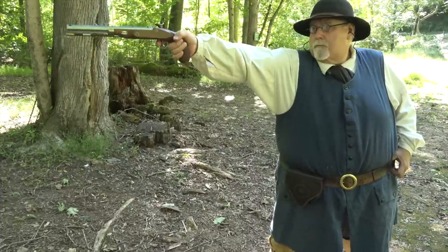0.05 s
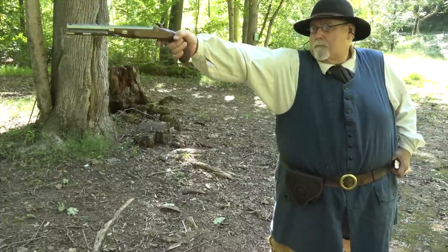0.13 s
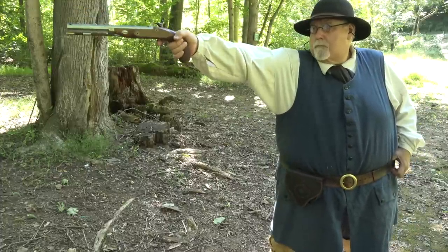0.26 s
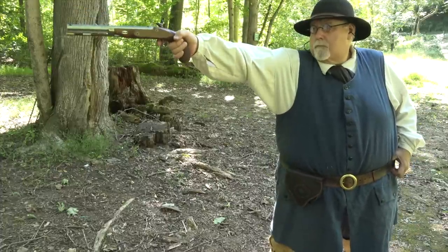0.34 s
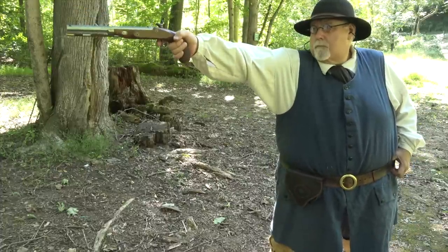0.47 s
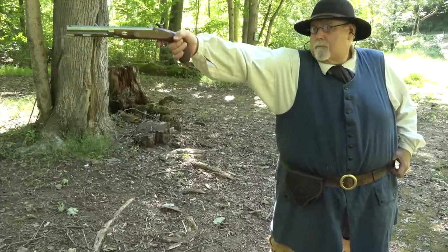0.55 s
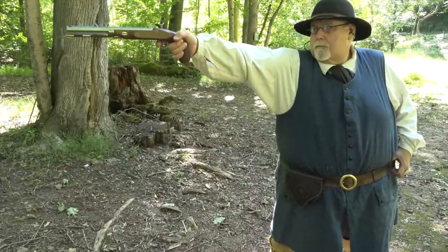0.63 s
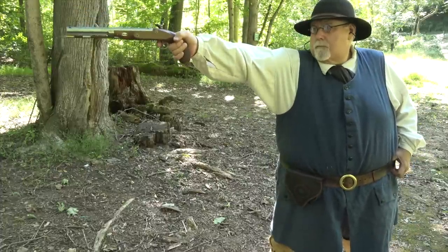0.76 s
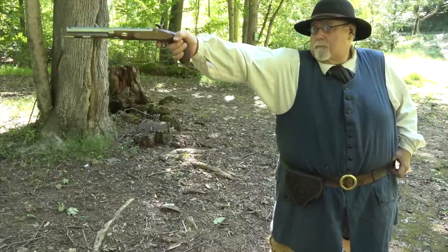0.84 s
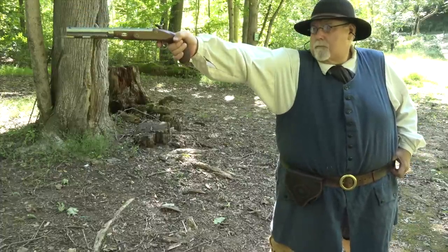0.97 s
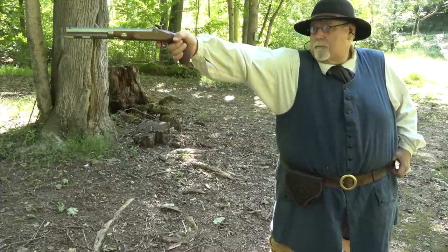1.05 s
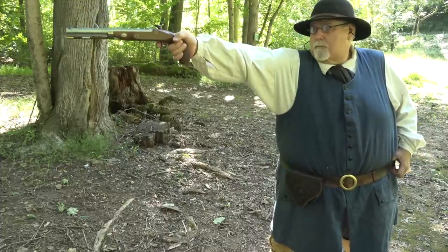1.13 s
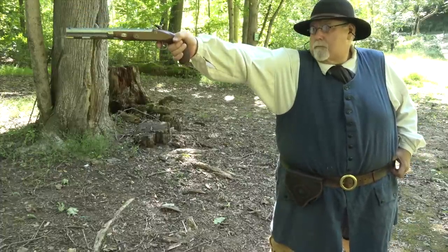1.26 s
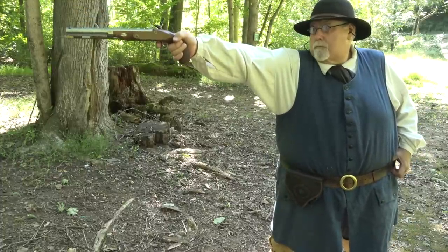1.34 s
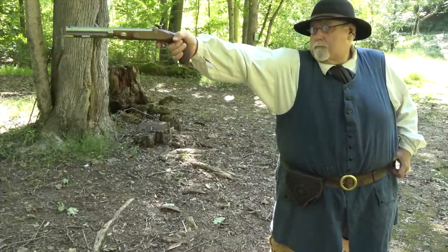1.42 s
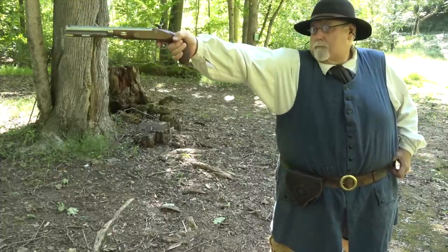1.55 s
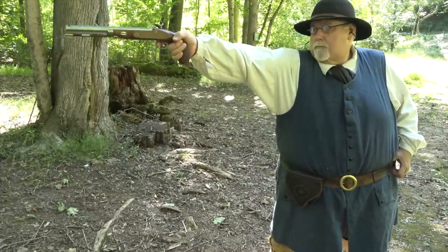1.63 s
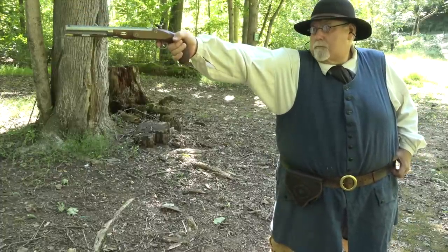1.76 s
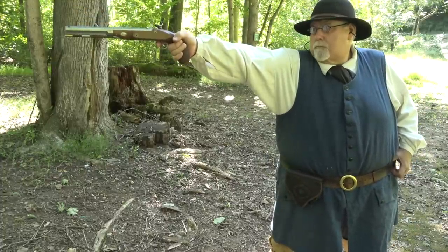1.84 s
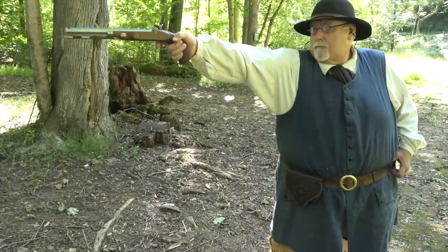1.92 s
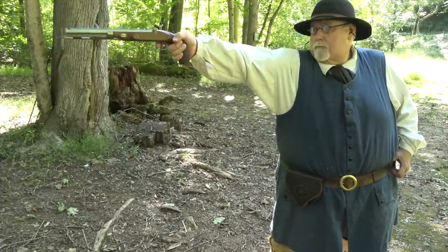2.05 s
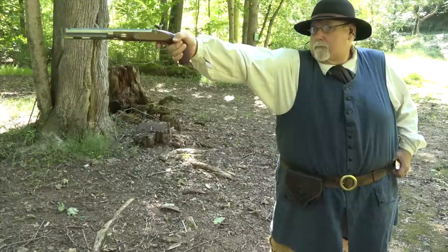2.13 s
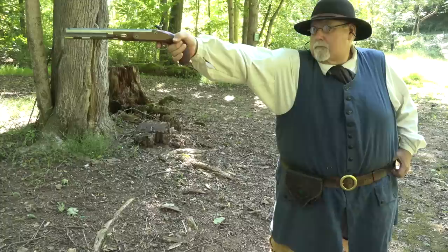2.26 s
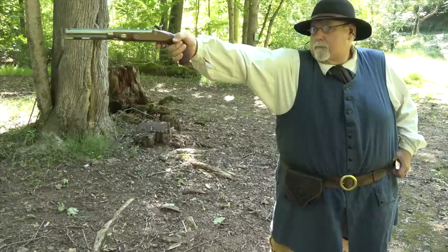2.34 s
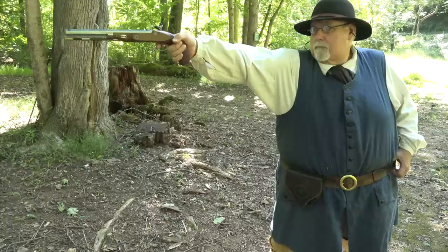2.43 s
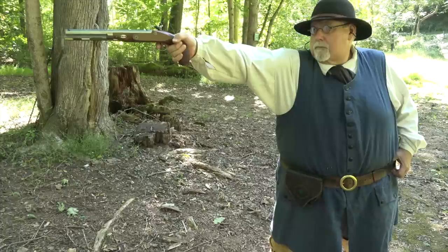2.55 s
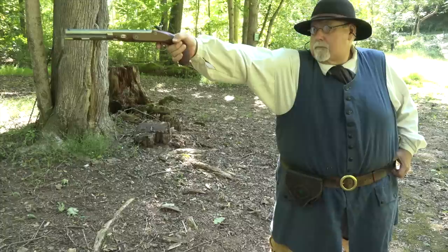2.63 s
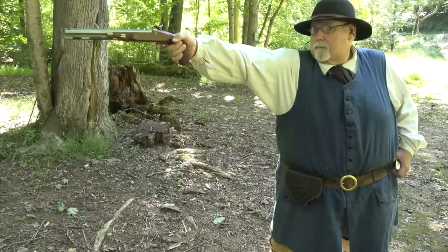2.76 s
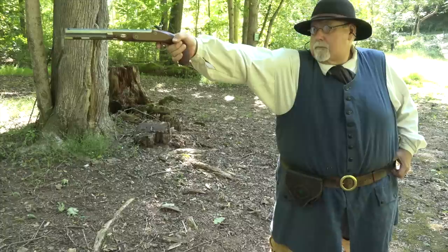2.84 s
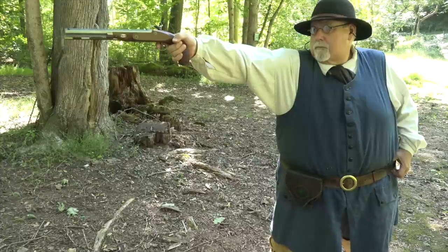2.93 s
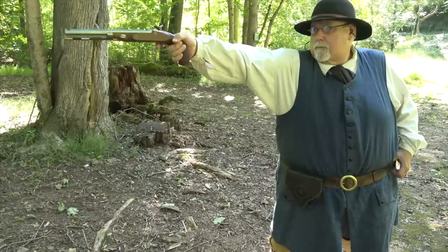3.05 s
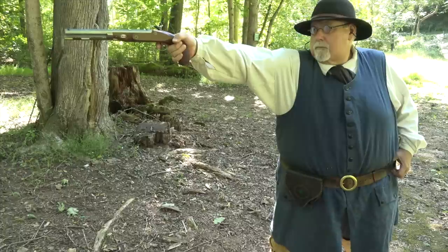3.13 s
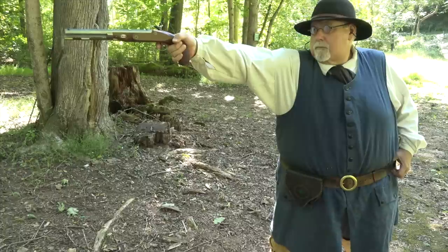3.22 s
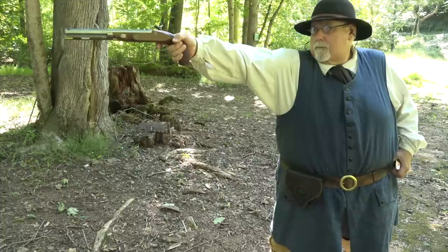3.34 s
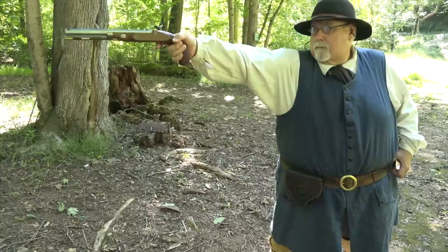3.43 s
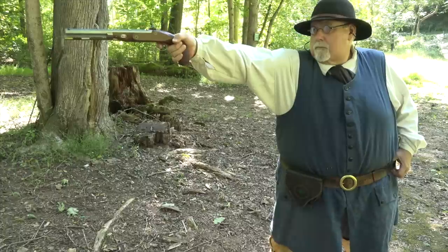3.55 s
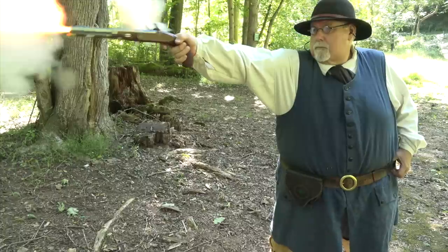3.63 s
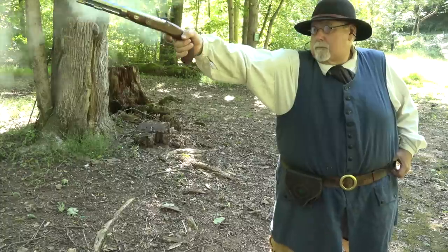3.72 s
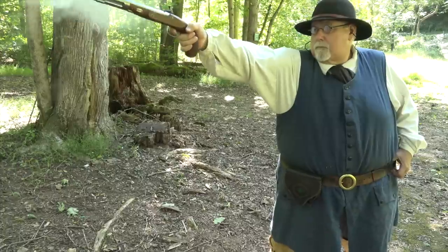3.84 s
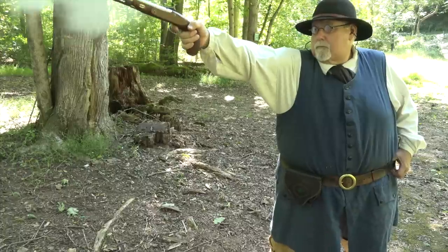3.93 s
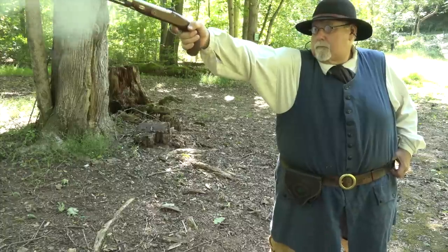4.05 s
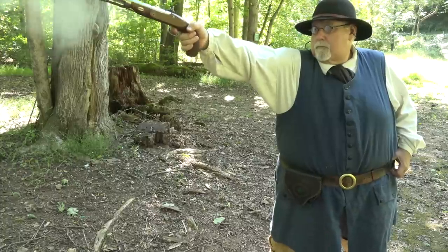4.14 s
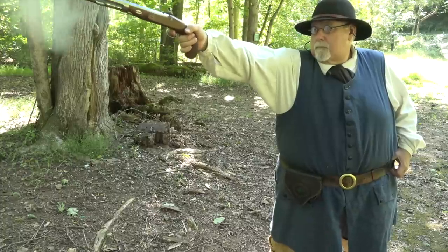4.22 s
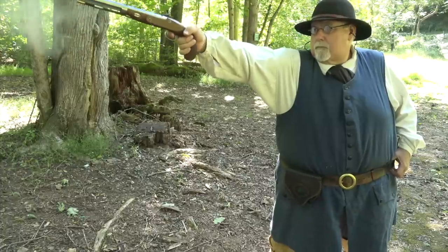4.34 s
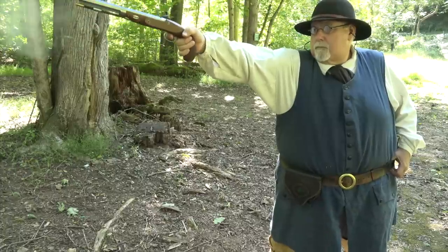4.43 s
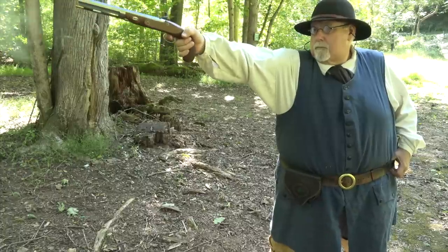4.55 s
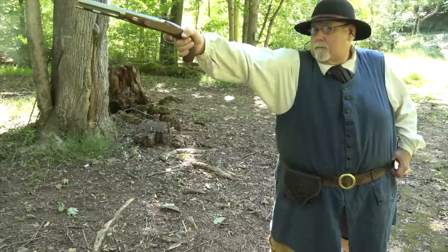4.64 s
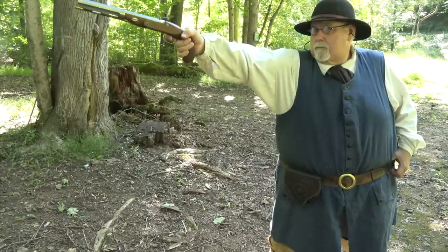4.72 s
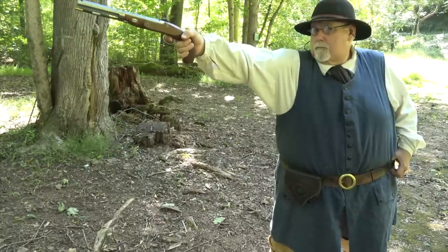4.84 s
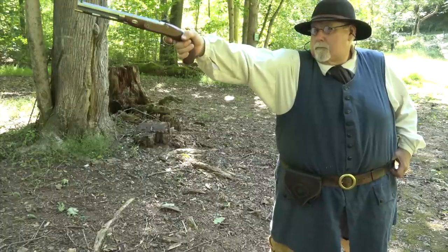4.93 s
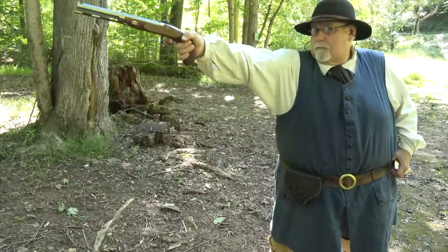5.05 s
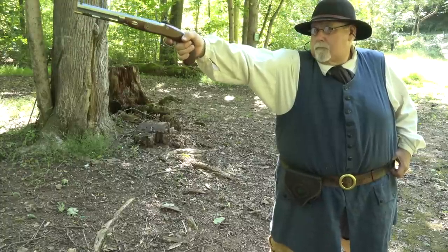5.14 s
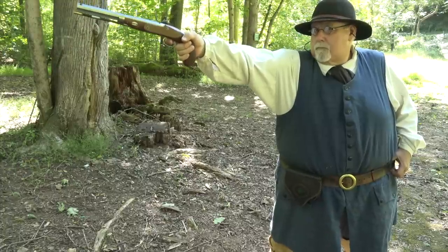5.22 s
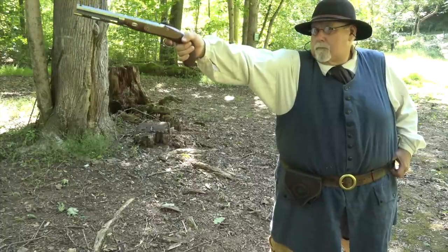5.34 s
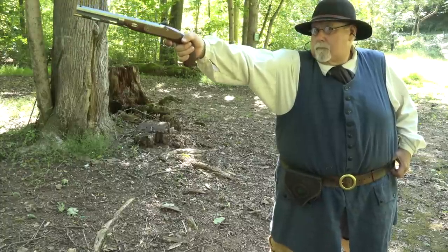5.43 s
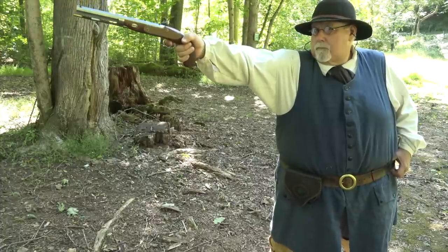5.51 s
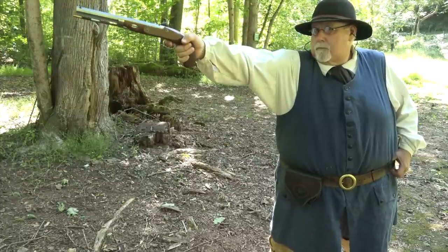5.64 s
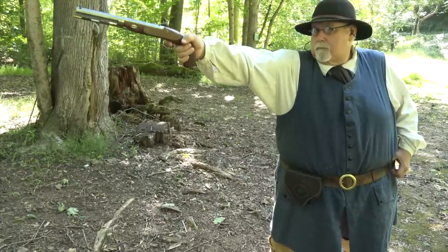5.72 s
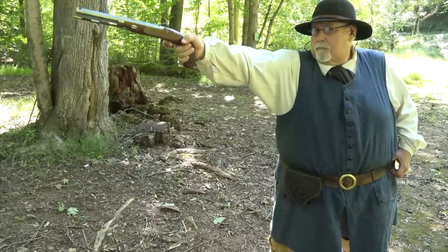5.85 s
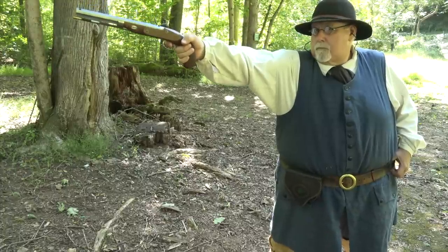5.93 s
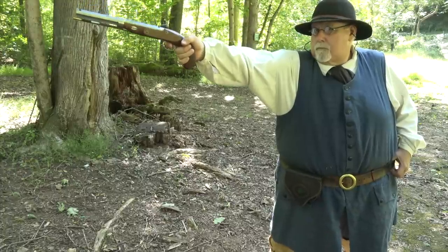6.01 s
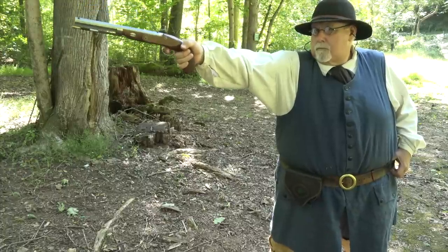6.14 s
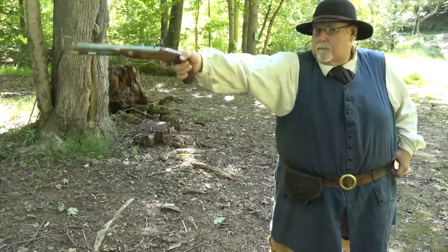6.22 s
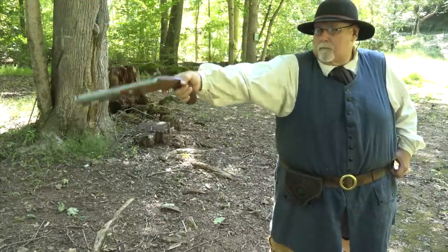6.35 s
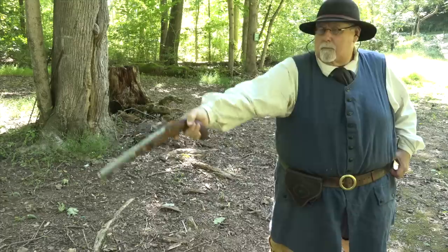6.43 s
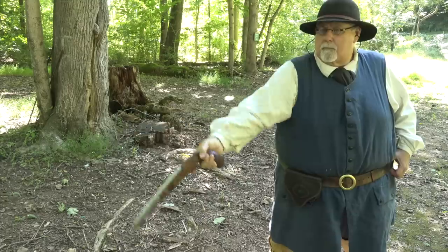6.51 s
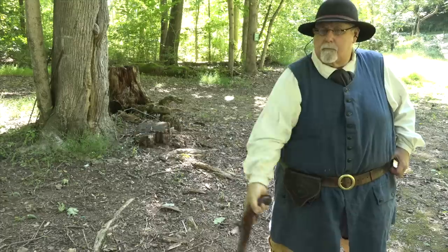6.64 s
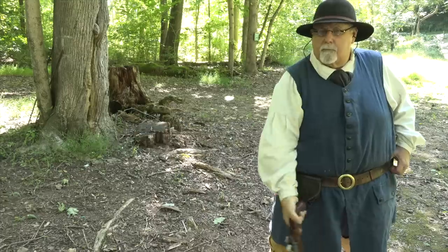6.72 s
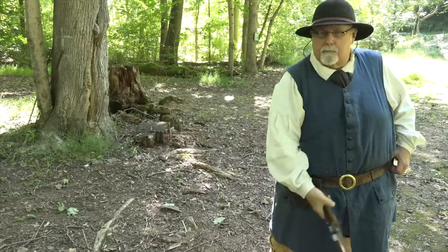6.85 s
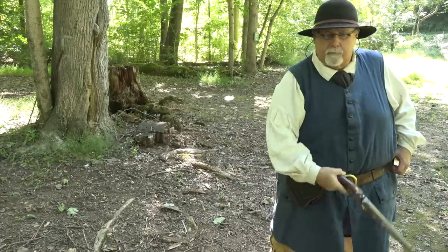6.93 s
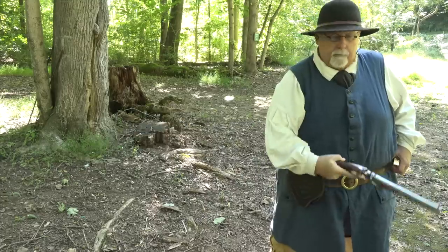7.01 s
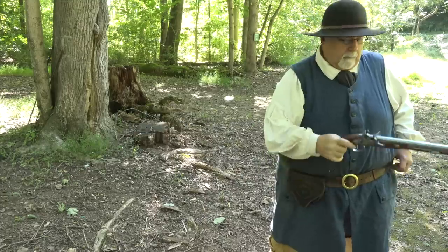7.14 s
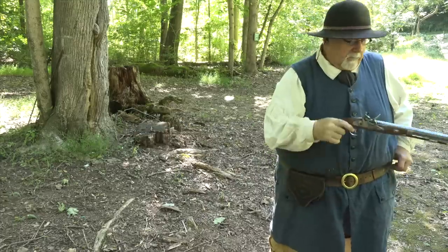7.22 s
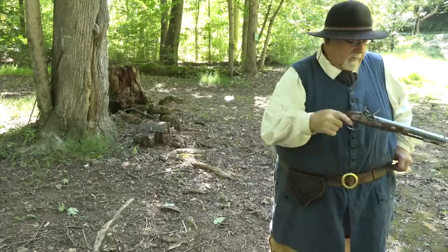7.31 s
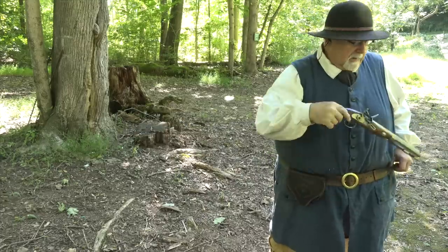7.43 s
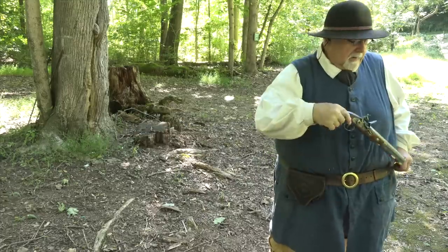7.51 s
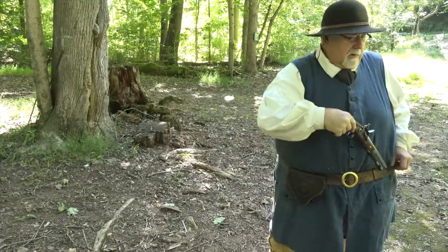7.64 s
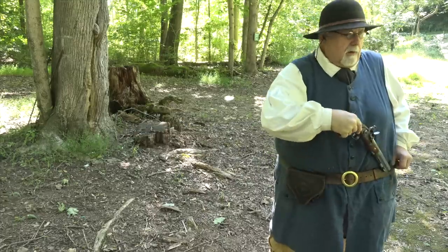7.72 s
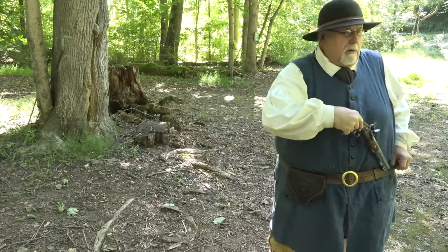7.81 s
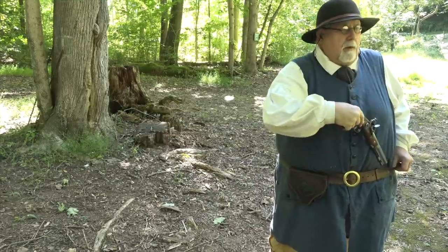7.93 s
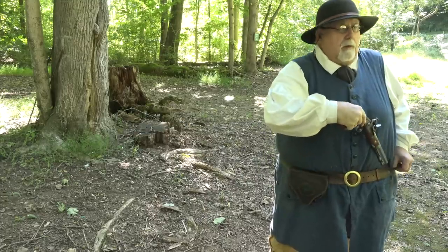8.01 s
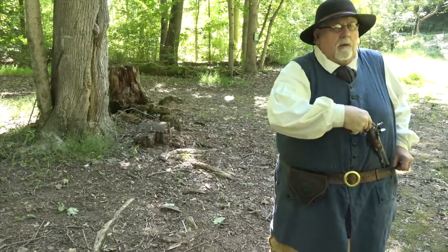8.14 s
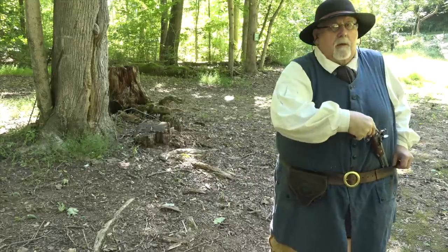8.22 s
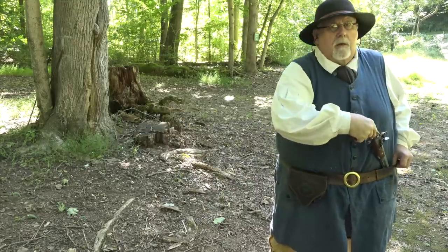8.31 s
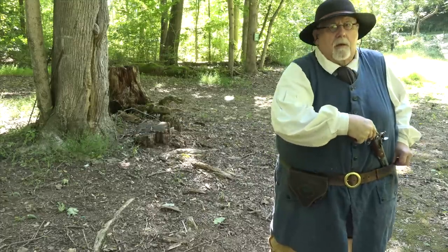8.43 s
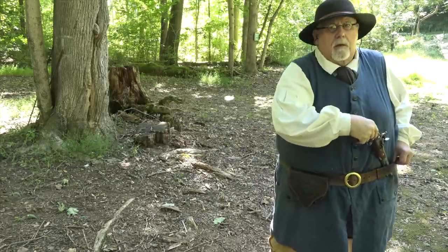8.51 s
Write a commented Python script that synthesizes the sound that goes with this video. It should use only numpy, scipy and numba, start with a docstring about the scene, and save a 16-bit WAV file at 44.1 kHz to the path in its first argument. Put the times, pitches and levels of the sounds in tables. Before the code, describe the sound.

Over faint woodland hiss and crickets, a flintlock pistol ticks, fizzes and cracks with one huge boom, its echo rolling off through the trees.

```python
"""A summer wood: a flintlock pistol is fired a few metres from a stereo microphone.
The flint ticks on the steel, the pan hisses and puffs, and the charge cracks (resonant noise) and booms (sines).
Near trunks, then far woods return it as shaped noise. Crickets and a far bird are gliding sines over noise hiss.
The shot clips the capsule; gain control ducks hiss and crickets, and creeps back up while the gun is handled."""
import sys
import numpy as np
from scipy import signal
from scipy.io import wavfile
from scipy.ndimage import uniform_filter1d, minimum_filter1d
from numba import njit

SR = 44100
rng = np.random.default_rng(int(sys.argv[2]) if len(sys.argv) > 2 else 0)


def transcribe(u):
    """Save the signal u as a 16-bit wav file named by the first command-line argument.

    u: samples, shape (n,) or (channels, n), limited to [-1, 1]; the rate is SR.
    q: integer samples, one column per channel.
    """
    v = np.clip(np.atleast_2d(u).T, -1, 1)
    q = np.round(v * 32767).astype(np.int16)
    wavfile.write(sys.argv[1], SR, q)


N = 377937  # samples
SHOT_S = 3.6665
GUN_PAN_DB = 2.8  # left minus right


def undb(db):
    """Amplitude ratio of a level in dB."""
    return 10 ** (np.asarray(db, float) / 20)


def add(out, s, x, pan_db=0., right_lag=0):
    """Mix a sound in at s seconds, panned by left minus right dB; the right port hears it right_lag samples late."""
    i = int(round(s * SR))
    x = (x * undb([[pan_db / 2], [-pan_db / 2]]))[:, :N - i]
    x[1] = np.roll(x[1], right_lag)
    out[:, i:i + x.shape[1]] += x


def over_hz(hz, table, axis=1):
    """A table column joined on a log-frequency axis."""
    table = np.array(table, float)
    log_hz = np.log(np.maximum(hz, 1))
    return np.interp(log_hz, np.log(table[:, 0]), table[:, axis])[:, None]


def field(size, level_db, pan_db, like):
    """Stereo noise whose density and lean in dB depend on (Hz, s); likeness sets the share common to both sides."""
    hz, s, z = signal.stft(rng.standard_normal((2, size)), SR, nperseg=1024)
    likeness = np.clip(over_hz(hz, like), 0, 1)
    shared = np.sqrt(likeness)
    mid = z[0] * np.sqrt((1 + shared) / 2)
    side = z[1] * np.sqrt((1 - shared) / 2)
    gain = undb(level_db(hz, s)) * np.sqrt(SR / 2)  # makes the level a density per Hz
    tilt = undb(pan_db(hz, s) / 2)
    stereo = np.array([(mid + side) * tilt, (mid - side) / tilt]) * gain
    return signal.istft(stereo, SR, nperseg=1024)[1][:, :size]


def lean(hz, pan):
    """Left minus right dB: one lean that fades in the top treble, another in a bell around the low mids."""
    broad_db, low_mid_db = pan
    bell = np.exp(-.5 * (np.log2(np.maximum(hz, 1) / 500) / .8) ** 2)  # centre 500 Hz, spread .8 octave
    return (broad_db / (1 + (hz / 8000) ** 4) + low_mid_db * bell)[:, None]


def lumps(size, hold):
    """Random levels held for `hold` samples and slewed."""
    steps = np.repeat(rng.standard_normal(size // hold + 1), hold)
    return uniform_filter1d(steps, size=hold)[:size]


def burst(hz, width, t60):
    """A click and dying noise in one steep, broad resonance (width as a fraction of its Hz); peak 1."""
    t = np.arange(2048) / SR
    x = rng.standard_normal(len(t)) * undb(-60 * t / t60)
    x[0] = 1.8
    for _ in range(2):
        x = signal.lfilter(*signal.iirpeak(min(hz, .3 * SR), 1 / width, SR), x)
    return x / np.abs(x).max()


def note(length, hz0, hz1, arch_hz=0.):
    """A soft-edged sine that glides and arches in pitch."""
    u = np.linspace(0, 1, int(length * SR))
    swell = np.sin(np.pi * u)
    hz = hz0 + (hz1 - hz0) * u + arch_hz * swell
    return swell * np.sin(2 * np.pi * np.cumsum(hz) / SR)


# muzzle blast, then its strongest bounces off ground and trunk: [delay after shot t/s, crack level/dB, f/Hz]
BLAST_CRACKS = [(.0008, 16.5, 3500), (.0025, 21, 1800), (.0062, 25, 1400), (.008, 23, 1800),
                (0.0116, 15, 1200), (0.018, 10, 2200)]
# ringing of the gas bubble: [f/Hz, level/dB, t60/s]
GAS_BOOM = [(139, 13.5, 0.099), (192, 9.5, 0.076), (60, 7, 0.1), (350, 13, 0.041), (580, 8.5, 0.071)]


def shot(out):
    """Cracks of turbulent gas on a low boom of decaying sines."""
    # the barrel mouth whistles as the ball leaves
    add(out, SHOT_S - .0012, undb(4) * note(0.0026, 7600, 8400), GUN_PAN_DB, right_lag=1)
    for delay, db, hz in BLAST_CRACKS:
        add(out, SHOT_S + delay, undb(db) * burst(hz, width=2.2, t60=.013), GUN_PAN_DB)
    t = np.arange(SR) / SR
    boom = sum(undb(db - 60 * t / t60) * np.sin(2 * np.pi * hz * t) for hz, db, t60 in GAS_BOOM)
    add(out, SHOT_S + 0.0042, boom, GUN_PAN_DB)


# flint biting the steel, the hardest catches: [t/s, level/dB]
FLINT_CATCHES = [(3.572, -7.5), (3.5982, -5), (3.603, -2), (3.607, -1)]
CHATTER_GAP_S, CHATTER_DB, CHATTER_SPREAD_DB = .0028, -12, 3
FLINT_HZ, FLINT_DULLS_HZ_PER_S = 5800, 50000


def flint(out):
    """Each catch on the steel is a bright tick, duller as the flint slows, with uneven chatter among them."""
    start = FLINT_CATCHES[0][0]
    when, size = rng.standard_normal((7, 2)).T
    chatter_s = start + CHATTER_GAP_S * (np.arange(2, 9) + .25 * when)
    chatter = zip(chatter_s, CHATTER_DB + CHATTER_SPREAD_DB * size)
    for s, db in list(FLINT_CATCHES) + list(chatter):
        hz = FLINT_HZ - FLINT_DULLS_HZ_PER_S * (s - start)
        add(out, s, undb(db) * burst(hz, width=1.15, t60=0.0075), GUN_PAN_DB)


def powder(out, s, rise_s, db, fall_db_s, band_hz, side_db):
    """Hiss or puff: band noise that swells, then falls until the shot; side_db sets its stereo spread."""
    t = np.arange(0, SHOT_S - s, 1 / SR)
    band = signal.butter(2, band_hz, "band", fs=SR, output="sos")
    mid, side = signal.sosfilt(band, rng.standard_normal((2, SR // 10)))
    stereo = mid + undb(side_db) * side * np.array([[1], [-1]])
    swell = np.minimum(t / rise_s, 1) ** .5
    fall = undb(db - fall_db_s * np.maximum(t - rise_s, 0))
    add(out, s, stereo[:, :len(t)] / mid.std() * swell * fall, GUN_PAN_DB)


def priming(out):
    """The pan hisses and puffs once, then a last short hiss and puff lead into the shot; puffs spread wide."""
    powder(out, 3.574, rise_s=.04, db=-19.5, fall_db_s=250, band_hz=[1100, 6500], side_db=-25)  # pan hiss
    powder(out, 3.617, rise_s=.013, db=-21.5, fall_db_s=800, band_hz=[110, 500], side_db=-8)  # pan puff
    powder(out, 3.656, rise_s=.003, db=-18, fall_db_s=500, band_hz=[1500, 9000], side_db=-25)  # last hiss
    powder(out, 3.655, rise_s=.003, db=-25, fall_db_s=3000, band_hz=[150, 900], side_db=-8)  # last puff


# echo from the near trunks: [f/Hz, starting level/dB per Hz, t60/s before the late loss]
NEAR_TRUNKS = [(40, -42, 1.5), (128, -22.5, 1.37), (293, -30.5, 1.96), (583, -29.5, 1.85),
               (1110, -32.5, 1.8), (2140, -28.5, 1.46), (4040, -29.5, 1.12), (5430, -30, 0.9),
               (8920, -42, 0.61), (15100, -51, 0.4)]
# echo from the far woods, duller and more to the right: [f/Hz, starting level/dB per Hz, t60/s before the late loss]
FAR_WOODS = [(40, -41, 2.8), (120, -41, 4), (196, -42.5, 4.3), (372, -37.5, 4.4), (750, -40, 3.94),
             (1300, -40, 2.98), (2450, -42.5, 2.18), (4500, -92, 1.5)]
# how alike the echo is left and right: [f/Hz, likeness 0 to 1]
ECHO_LIKENESS = [(60, 0.98), (300, .97), (640, 0.95), (1400, 1), (3100, .99), (5500, 0.97), (8000, 0.2),
                 (15000, 0.64)]
# denser stands of trees answer in swells: [t/s, lift level/dB]
DENSE_STANDS = [(3.93, 5), (4.03, 5)]
# left minus right: (broad lean dB, low-mid lean dB)
TRUNKS_PAN, WOODS_PAN = (3, -1), (.5, -5)
TRUNKS_RISE_S, WOODS_RISE_S, STAND_SPREAD_S = .012, .3, .04
PATCHY_DB, SURGE_DB = 1.2, .7  # short and long lumps, before slewing
LATE_LOSS_DB = .87  # times seconds squared, as the returns thin out


def echoes(out):
    """Scattered returns with a decay for each pitch, the highs dying soonest; lumpy as trunks stand unevenly."""
    t = np.arange(4 * SR) / SR
    swell_db = sum(db * np.exp(-.5 * ((t + SHOT_S - s) / STAND_SPREAD_S) ** 2) for s, db in DENSE_STANDS)
    returns = ((NEAR_TRUNKS, TRUNKS_PAN, TRUNKS_RISE_S), (FAR_WOODS, WOODS_PAN, WOODS_RISE_S))
    for table, pan, rise_s in returns:
        def level_db(hz, s):
            return over_hz(hz, table) - 60 * s / over_hz(hz, table, axis=2)

        echo = field(len(t), level_db, lambda hz, s: lean(hz, pan), ECHO_LIKENESS)
        rough_db = PATCHY_DB * lumps(len(t), hold=300) + SURGE_DB * lumps(len(t), hold=2500)
        rise = 1 - np.exp(-t / rise_s)
        add(out, SHOT_S, echo * rise * undb(swell_db + rough_db - LATE_LOSS_DB * t ** 2))


# small ticks of lock, buckle and twigs; the lower, the broader: [t/s, level/dB, f/Hz]
HANDLING_TICKS = [(1.171, -45, 12500), (5.369, -43, 8300), (6.178, -38, 8400), (6.709, -40, 12500),
                  (7.093, -26, 5200), (7.644, -24.5, 3300), (7.6555, -37, 3500), (7.799, -43, 13000),
                  (7.935, -33, 2000), (8.2257, -27.5, 2200)]
# cloth sliding: [t/s, length/s, f/Hz, level/dB]
SLEEVE_RUBS = [(6.252, 0.63, 9400, -61.5), (7.149, .5, 4050, -62)]


def handling(out):
    """Ticks are resonant bursts; cloth is grainy noise in one resonance."""
    for s, db, hz in HANDLING_TICKS:
        add(out, s, undb(db) * burst(hz, min(3600 / hz, 2.4), t60=0.011))
    for s, length, hz, db in SLEEVE_RUBS:
        size = int(length * SR)
        grains = rng.standard_normal(size) * undb(1.5 * rng.exponential(size=size))
        cloth = signal.lfilter(*signal.iirpeak(hz, 6, SR), grains)
        add(out, s, undb(db) * cloth / cloth.std() * np.hanning(size) ** .5)


# wind buffeting the microphone: [t/s, level/dB]
WIND_BUFFETS = [(0.159, -38), (0.238, -37), (0.439, -43), (2.349, -45), (2.415, -41), (2.559, -32.5),
                (2.829, -40.5), (3.331, -39), (5.969, -36)]


def buffets(out):
    """Each push of wind on the microphone is about two low cycles, sliding down."""
    for s, db in WIND_BUFFETS:
        add(out, s - .005, undb(db) * note(2.1 / 55, 66, 28.6), pan_db=1.5)


# the other singers: [f/Hz, mean rate/chirps per s, mean level/dB, left minus right/dB]
CRICKET_CHORUS = [(7500, 5.6, -55, -3), (7100, 5.2, -55, -2), (7000, 6.1, -58, 2), (6750, 4.7, -58, -2),
                  (6000, 5.5, -60, 0)]
# nearest cricket: its chirps a second, their slowing per second, mean level and pan
FIRST_CHIRP_S, CRICKET_RATE, CRICKET_SLOWS = .025, 5.115, .0196
CRICKET_DB, CRICKET_PAN_DB, CHIRP_S = -51, 7, .038


def crickets(out):
    """Arched sine chirps: one regular singer close by; the others drift in and out of step."""
    k = np.arange(int(N / SR * CRICKET_RATE) - 1)
    chirp_s = FIRST_CHIRP_S + k / (CRICKET_RATE - CRICKET_SLOWS / 2 * k / CRICKET_RATE)
    for s, size in zip(chirp_s, rng.standard_normal(len(k))):
        chirp = undb(CRICKET_DB + 0.87 * size) * note(CHIRP_S, 7400, 7320, arch_hz=300)
        add(out, s - CHIRP_S / 2, chirp, CRICKET_PAN_DB, right_lag=2)
    for hz, rate, db, pan_db in CRICKET_CHORUS:
        gap, size, tune = rng.standard_normal((3, int(N / SR * 7)))
        for s, louder, sharper in zip(np.cumsum((1 + 0.073 * gap) / rate), size, tune):
            if s < N / SR:
                chirp = note(CHIRP_S, hz + 30 * sharper, hz - 120, arch_hz=72)
                add(out, s, undb(db + 2.3 * louder) * chirp, pan_db, right_lag=-1)


# short phrases of a far bird: [t/s, notes, f/Hz, level/dB of the last note]
BIRD_PHRASES = [(.63, 3, 4000, -50), (2.72, 3, 4100, -47), (3.357, 2, 4020, -51)]


def bird(out):
    """Sagging sine notes off to the left, each phrase swelling 3 dB a note."""
    for s, notes, hz, db in BIRD_PHRASES:
        count = int(round(notes))
        for k in range(count):
            tone = note(.055, hz, hz - 120, arch_hz=60)
            add(out, s + k * .055, undb(db - 3 * (notes - 1 - k)) * tone, pan_db=6.0)


# colour of the steady hiss of leaves and preamp: [f/Hz, relative level/dB per Hz]
HISS_COLOUR = [(15, -34), (25, 4), (217, -2.5), (285, -2.5), (405, -5), (476, -5), (575, -4.5), (796, -3.5),
               (1700, -1), (3920, -3), (7510, -7), (8590, -18.5), (13200, -21.5), (16000, -26.5)]
# how alike the hiss is left and right: [f/Hz, likeness 0 to 1]
HISS_LIKENESS = [(60, 0.93), (290, 0.75), (640, 0.84), (1200, 1), (6000, 0.99), (6900, 0.17), (11000, 0.23),
                 (12500, .99)]
# lift or drop of the bass in the breeze: [t/s, level/dB]
BREEZE_BASS = [(0, 3), (.6, 2), (.9, -3.5), (1.9, -3), (3.5, 3), (5.6, -4), (6, 7), (7.2, -1.5), (8.6, -2)]
# span over which the hiss drifts to the right, most in the low mids: [start t/s, end t/s]
DRIFT_S = [3.0, 5.5]
HISS_DB, GUST_TOP_HZ = -44.5, 130
HISS_PAN, LATE_PAN = (1.5, -3), (0, -5)  # left minus right: (broad lean dB, low-mid lean dB)


def hiss():
    """Smooth shaped noise; the breeze moves only its bass."""
    breeze_s, breeze_db = np.transpose(BREEZE_BASS)

    def level_db(hz, s):
        bass = 1 / (1 + (hz[:, None] / GUST_TOP_HZ) ** 4)
        return over_hz(hz, HISS_COLOUR) + np.interp(s, breeze_s, breeze_db) * bass

    def pan_db(hz, s):
        early, late = lean(hz, HISS_PAN), lean(hz, LATE_PAN)
        return early + np.interp(s, DRIFT_S, [0, 1]) * (late - early)

    x = field(N, level_db, pan_db, HISS_LIKENESS)
    return x * undb(HISS_DB) / np.mean(x, axis=0).std()


def scene():
    """Everything in the wood, laid over the hiss."""
    out = hiss()
    for source in (shot, flint, priming, echoes, handling, buffets, crickets, bird):
        source(out)
    return out


OVERLOAD_DB, LOW_CUT_HZ, TOP_HZ = 11.5, 56, 15750
LIMIT_DB, ATTACK_S, RELEASE_S = -7, .0015, .039  # quick gain stage
DUCK_DB, SINK_DB_S, CREEP_DB_S = 11., 63, 3  # slow gain stage: deepest cut, dB per second down and back


@njit
def riding(over_db, attack, release, duck_db, sink, creep):
    """Gain cut in dB: a quick stage chases the peaks, a slow stage sinks under load and creeps back."""
    cut, quick, slow = np.empty(len(over_db)), 0., 0.
    for i in range(len(over_db)):
        quick += (over_db[i] - quick) * (attack if over_db[i] > quick else release)
        slow = min(slow + sink, duck_db) if quick > slow else max(slow - creep, 0.)
        cut[i] = max(quick, slow)
    return cut


def record(dry):
    """The capsule clips the blast, the bass is cut, gain control rides the level, the top is cut."""
    x = undb(OVERLOAD_DB) * np.tanh(dry / undb(OVERLOAD_DB))
    x = signal.sosfilt(signal.butter(2, LOW_CUT_HZ, "high", fs=SR, output="sos"), x)
    peak = -minimum_filter1d(-np.abs(x).max(axis=0), size=220)  # loudest of either side in a 5 ms window
    over_db = np.maximum(20 * np.log10(peak + 1e-9) - LIMIT_DB, -6)
    attack, release = 1 / (ATTACK_S * SR), 1 / (RELEASE_S * SR)
    x = x * undb(-riding(over_db, attack, release, DUCK_DB, SINK_DB_S / SR, CREEP_DB_S / SR))
    return signal.sosfilt(signal.ellip(10, .2, 80, TOP_HZ, fs=SR, output="sos"), x)


dry = scene()
out = record(dry)
transcribe(out)
```